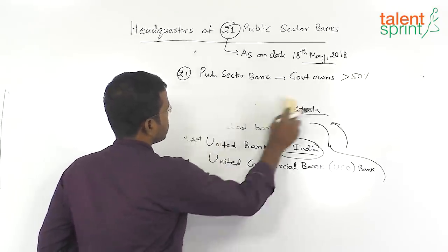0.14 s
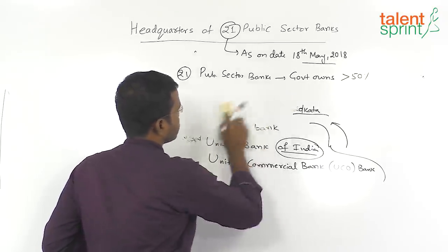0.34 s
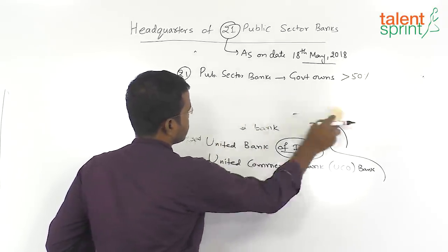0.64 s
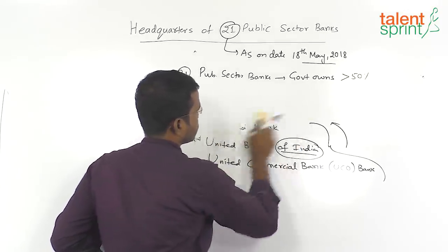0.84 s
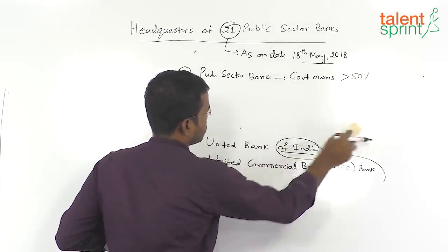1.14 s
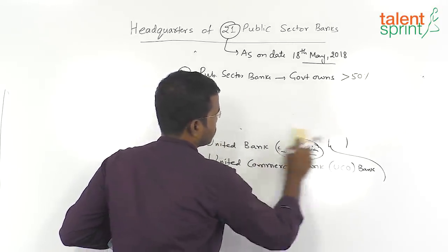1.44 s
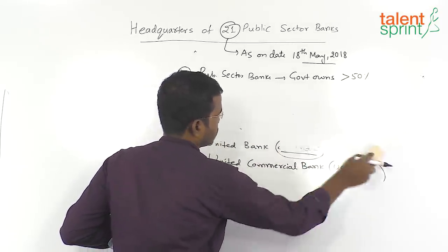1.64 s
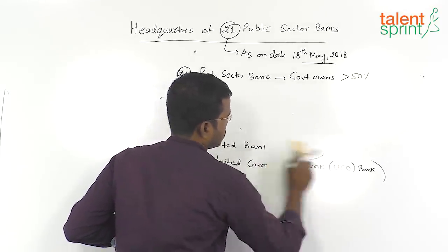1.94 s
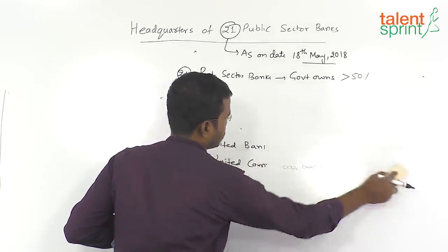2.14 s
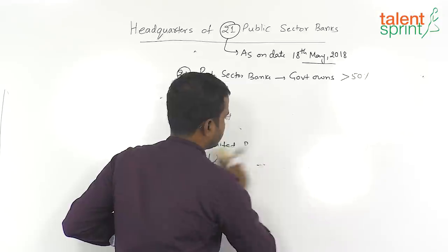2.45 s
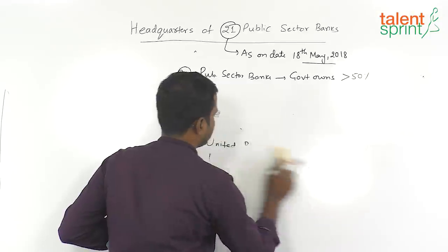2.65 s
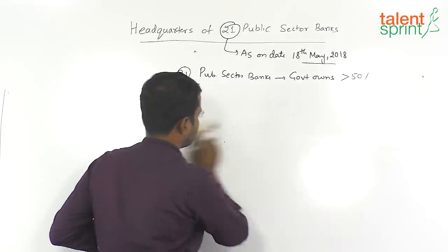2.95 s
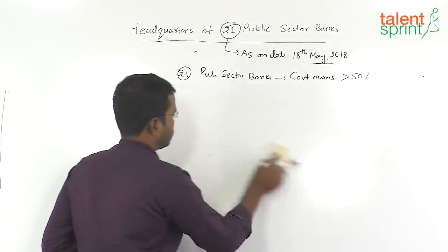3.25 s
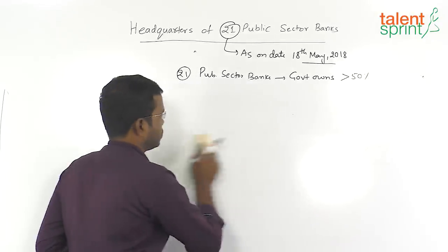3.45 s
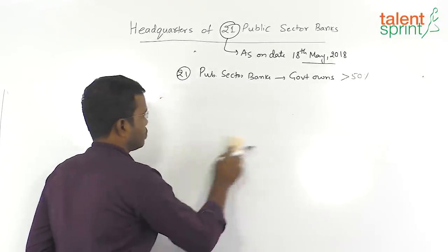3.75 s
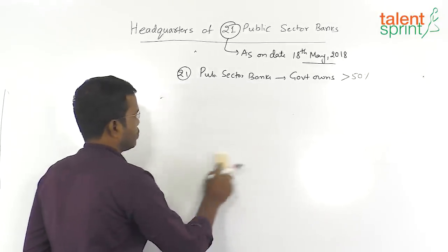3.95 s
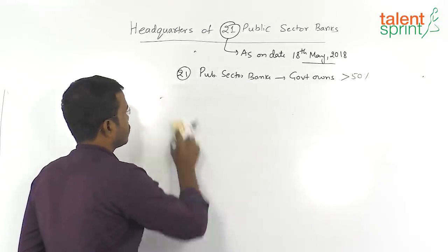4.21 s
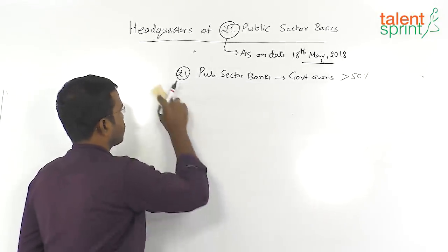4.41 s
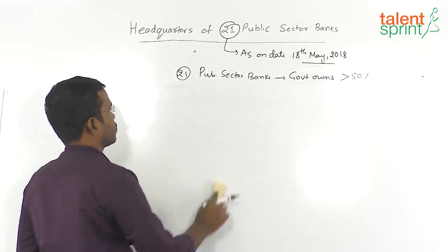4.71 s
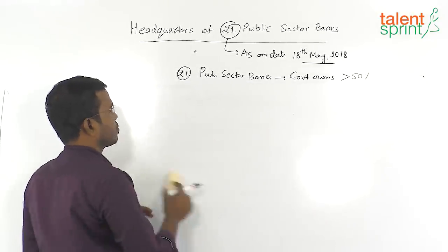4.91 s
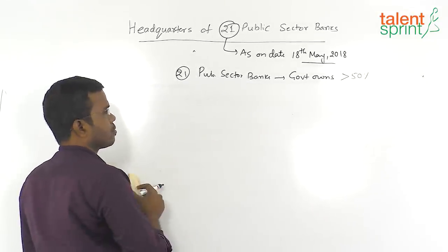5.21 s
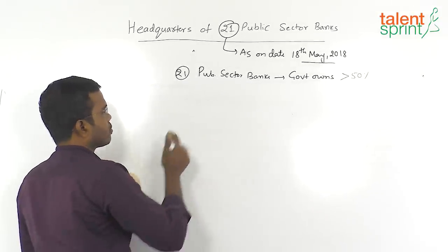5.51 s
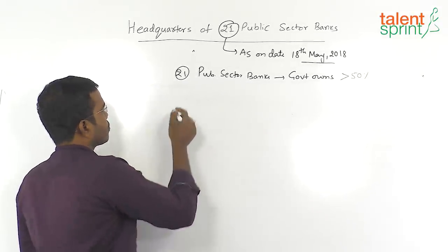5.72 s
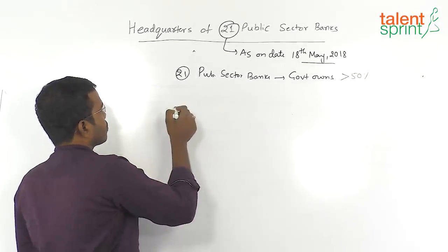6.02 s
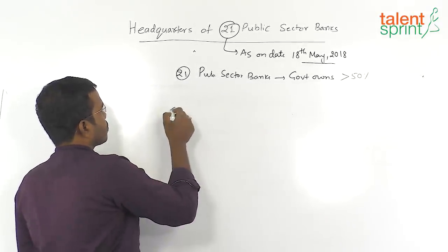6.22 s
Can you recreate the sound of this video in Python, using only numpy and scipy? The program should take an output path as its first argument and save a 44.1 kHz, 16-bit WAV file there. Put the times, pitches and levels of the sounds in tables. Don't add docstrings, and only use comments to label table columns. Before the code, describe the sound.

A felt eraser hisses back and forth across a whiteboard in brisk strokes, a marker taps once, air thumps the microphone, then cloth rustles.

```python
import sys
import numpy as np
from scipy import signal
from scipy.fft import rfft, irfft, next_fast_len
from scipy.io import wavfile
from scipy.ndimage import uniform_filter1d, map_coordinates

SR = 44100
rng = np.random.default_rng(int(sys.argv[2]) if len(sys.argv) > 2 else 0)


def natural_amplitude(level_db):
    exponent = np.asarray(level_db, float) / 20
    return 10 ** exponent


def waveform_to_disk(signal):
    frames = np.transpose(np.atleast_2d(signal))
    scaled = np.clip(frames, -1, 1) * 32767
    samples = np.round(scaled).astype(np.int16)
    wavfile.write(sys.argv[1], SR, samples)


N = 280917


def unit(x):
    return x / np.sqrt(np.mean(x ** 2) + 1e-20)


def curves(rows):
    seconds, *columns = np.transpose(rows)
    return [np.interp(np.arange(N) / SR, seconds, column) for column in columns]


def wobble(rate):
    knots = rng.standard_normal(int(N * rate / SR) + 4)
    return map_coordinates(knots, [np.arange(N) * rate / SR])


def filtered(x, response):
    m = next_fast_len(N + SR // 2)
    return irfft(rfft(x, m) * response(np.fft.rfftfreq(m, 1 / SR)), m)[:N]


def shape(points):
    f, db = np.transpose(points)
    return lambda hz: natural_amplitude(np.interp(np.log(hz + 1), np.log(f + 1), db))


def resonance(f, hz, width):
    return 1j * f * width / (hz * hz - f * f + 1j * f * width)


def scuff(grit_db, patchy_db):
    grains = rng.standard_normal(N) * natural_amplitude(grit_db * wobble(900))
    z = signal.stft(grains, nperseg=512)[2]
    field = uniform_filter1d(rng.standard_normal(z.shape), 7, 0)
    field = uniform_filter1d(field, 9, 1)
    return signal.istft(z * natural_amplitude(patchy_db * unit(field)), nperseg=512)[1][:N]


def moving_band(x, centre_hz, low, high, round_top):
    f, t, z = signal.stft(x, SR, nperseg=512)
    centre = centre_hz[np.minimum((t * SR).astype(int), N - 1)]
    octaves = np.log2((f[:, None] + 1) / centre)
    bend = np.sqrt(octaves ** 2 + round_top ** 2)
    slope = np.where(octaves < 0, low, high)
    return unit(signal.istft(z * natural_amplitude(-slope * bend), SR, nperseg=512)[1][:N])


# hiss at mid-stroke in dB, swell from start to end in dB,
# low hollow in dB, high hollow in dB, dust in dB.
STROKE_LEVELS = [(-37.5, -5, -8.5, -11, -5), (-40.5, 11.5, -11, -10, -6), (-41, -7.5, -12, -7, -4),
                 (-40, 10, -11.5, -11, -7.5), (-40, -0.5, -8.5, -10, -3.5), (-40.5, 8, -8, -15, -7),
                 (-39, -3, -8.5, -12, -4.5), (-40.5, 14.5, -10.5, -16, -8), (-39, -8, -7, -8.5, -4),
                 (-39, 20, -9, -8.5, -6.5), (-35, -11.5, -13, -9, -10), (-36.5, 14.5, -6, -9.5, -5),
                 (-37.5, -15, -12, -5, -5), (-37, 11.5, -14, -14, -7), (-37.5, -9.5, -17, -16, -4.5),
                 (-38.5, 2.5, -28, -11.5, -5), (-38, 2, -17, -16, -4), (-40.5, -8, -18, -5.5, -4)]
# time in seconds, depth of the stop in dB, half width in seconds.
HAND_TURNS = [(.262, 16, 0.011), (.462, 8, .01), (.752, 15, 0.011), (.992, 9, 0.01), (1.267, 12, 0.017),
              (1.476, 6, .01), (1.719, 12, 0.018), (1.952, 12, 0.0079), (2.254, 10, 0.012),
              (2.577, 20, 0.014), (2.829, 6, 0.0068), (3.119, 12, 0.032), (3.377, 20, 0.0068),
              (3.587, 7.5, 0.012), (3.773, 21, 0.0086), (4.089, 12, 0.019), (4.489, 16, 0.02)]


def strokes():
    first_s, last_s = -0.063, 4.85
    arch_db, dust_arch_db = 1, 3
    lean = 0.2
    low_share, high_share = 0.4, 0.49
    edges = [first_s, *np.transpose(HAND_TURNS)[0], last_s]
    place = np.interp(np.arange(N) / SR, edges, np.arange(len(edges)) * (1 - 1e-9))
    mid_db, swell_db, low_db, high_db, dust_db = np.transpose(STROKE_LEVELS)[:, place.astype(int)]
    way = place % 1
    slack = np.sin(np.pi * way) - 1
    come_db = swell_db * (way - .5 + lean * np.sin(2 * np.pi * way) / (2 * np.pi))
    hiss_db = mid_db + come_db + arch_db * slack
    low_db = low_db + low_share * come_db + 2 * wobble(14)
    high_db = high_db + high_share * come_db + 2 * wobble(14)
    dust_db = dust_db + dust_arch_db * slack + 0.5 * wobble(12)
    return hiss_db, low_db, high_db, dust_db


# time in seconds, centre in Hz.
GRIP_TILT = [(0, 7250), (.3, 6500), (.95, 6580), (1.5, 6870), (2, 7100), (2.5, 6830), (3.1, 6900),
             (3.8, 6000), (4.1, 6350), (4.3, 5800), (4.47, 5940), (4.55, 6800), (4.7, 6860), (4.9, 5900)]
# time in seconds, share 0-1.
ECHO_SHARE = [(0, 0.9), (3.3, 0.8), (3.7, 0.34), (5, 0.1)]
# centre in Hz, width in Hz.
HOLLOW_MODES = [(3020, 770), (3780, 1440)]
# frequency in Hz, density in dB per Hz.
DUST_COLOUR = [(5000, -19.5), (7500, 0.5), (9000, -1.5), (10300, -4), (11200, -12.5), (12500, -13.5),
               (15700, -18)]


def eraser():
    hiss_db, low_db, high_db, dust_db = strokes()
    t = np.arange(N) / SR
    stop_db = sum(depth * np.exp(-np.abs((t - s) / half) ** 3) for s, depth, half in HAND_TURNS)
    lift_off = np.clip((4.95 - t) / 0.13, 0, 1)
    drag = natural_amplitude(hiss_db - stop_db + 0.89 * wobble(40)) * lift_off

    hiss = scuff(grit_db=0.5, patchy_db=1.5)
    hiss = moving_band(hiss, curves(GRIP_TILT)[0], low=13.3, high=27.2, round_top=0.085)
    echo = filtered(hiss, lambda f: .55 * np.abs(resonance(f, hz=4450, width=900)) ** 2)
    hiss = hiss - curves(ECHO_SHARE)[0] * echo

    low, high = (unit(filtered(scuff(grit_db=-1.5, patchy_db=1.5),
                               lambda f: resonance(f, hz, width) ** 1.47)) for hz, width in HOLLOW_MODES)
    hollow = natural_amplitude(low_db + 0.5) * low + natural_amplitude(high_db - 2.8) * high
    dust = unit(filtered(scuff(grit_db=0.0, patchy_db=1.8), shape(DUST_COLOUR)))
    return drag * (natural_amplitude(0.45) * hiss + natural_amplitude(0.3 * stop_db) * hollow + natural_amplitude(dust_db) * dust)


# frequency in Hz, level in dB, 60 dB decay in seconds,
# share by which it starts flat.
PANEL_MODES = [(523, -9, 0.026, 0), (730, -7.5, 0.02, 0.03), (1410, -6, 0.014, 0), (1616, 0, 0.0099, 0),
               (1970, -0.5, 0.017, 0.058), (2700, -4, .008, 0), (3440, -3.5, 0.066, 0.19)]


def tap():
    tap_s, tap_db = .2782, -11.5
    t = np.arange(SR // 5) / SR
    late = 0.0041 * (1 - np.exp(-t / 0.0039))
    ring = -sum(natural_amplitude(db - 60 * t / t60) * np.sin(2 * np.pi * hz * (t - flat * late))
                for hz, db, t60, flat in PANEL_MODES)
    ring = ring * (1 - np.exp(-t / 0.00014))
    walls = rng.standard_normal(len(t)) * natural_amplitude(-60 * t / 0.36) * (t > .006)
    walls = walls / np.linalg.norm(walls)
    ring = ring + natural_amplitude(-5.5) * signal.fftconvolve(ring, walls)[:len(t)]
    out = np.zeros(N)
    out[round(tap_s * SR):][:len(t)] = natural_amplitude(tap_db - 10.0) * ring
    return out


# time in seconds, peak in dB, rise in seconds, fall in seconds,
# colour in Hz.
SLEEVE_BRUSHES = [
    (5.112, -38, 0.0016, 0.03, 5700),
    (5.178, -42.5, 0.051, .012, 8700),
    (5.258, -47.5, 0.0067, 0.038, 7000),
    (5.399, -40, 0.022, .0093, 7240),
    (5.47, -56, .0046, 0.027, 6000),
    (5.6, -56.5, .076, 0.2, 7100),
    (5.905, -47.5, .069, .022, 5230),
    (5.87, -47.5, .086, .055, 1800),
]
# time in seconds, peak in dB, rise in seconds, fall in seconds,
# colour in Hz.
CAP_SCRAPES = [
    (5.12, -42, .008, 0.02, 2700),
    (5.324, -41.5, .017, 0.019, 6600),
    (5.325, -46, 0.014, .015, 10500),
    (6.2, -48, .012, 0.014, 4200),
    (.49, -46, .012, .006, 3600),
    (6.5, -52.5, .015, .2, 4930),
    (6.275, -48.5, .025, 0.13, 7200),
    (6.265, -58, 0.014, .2, 9600),
]


def rustles():
    out, t = np.zeros(N), np.arange(N) / SR
    brushes = [(*row, 1) for row in SLEEVE_BRUSHES] + [(*row, 0.28) for row in CAP_SCRAPES]
    for s, db, rise, fall, hz, width in brushes:
        grains = rng.standard_normal(N) * natural_amplitude(2.0 * wobble(300))
        brush = filtered(grains, lambda f: resonance(f, hz, width * hz) ** 2 / (1 + (f / 13200) ** 6))
        swell = np.exp(-((t - s) / np.where(t < s, rise, fall)) ** 2)
        out += natural_amplitude(db) * unit(brush) * swell
    return out


def eddies(spectrum, even, span):
    x = unit(filtered(rng.standard_normal(N), shape(spectrum)))
    power = uniform_filter1d(x ** 2, int(span * SR))
    swell = np.abs(uniform_filter1d(power, int(span * SR))) + 0.044
    return unit(x / swell ** (even / 2))


def puffs(s, db, half, calm_db):
    t = np.arange(N) / SR
    power = sum(natural_amplitude(2 * g) * np.exp(-((t - a) / h) ** 2) for a, g, h in zip(s, db, half))
    return np.sqrt(natural_amplitude(2 * calm_db) + power)


# time in seconds, slow eddies in dB, half length in seconds,
# middle eddies in dB over the slow ones.
AIR_PUFFS = [(0.624, -25, 0.031, -28), (1.105, -25.5, 0.067, -12), (1.5, -30.5, 0.13, -26),
             (1.67, -9.5, 0.023, -30), (1.76, -23.5, 0.033, -26), (1.988, -25, 0.068, -6.5),
             (2.123, -24, 0.05, -32), (2.39, -29.5, 0.034, -4.5), (2.55, -28, 0.038, 0),
             (2.664, -21, 0.041, -29), (2.815, -17.5, 0.093, -12), (3.03, -28, 0.027, 1.5),
             (3.148, -20.5, 0.049, -28), (3.194, -16, 0.032, -8), (3.3, -10, 0.036, -5.5),
             (3.396, -9, 0.063, -6), (3.487, -5.5, 0.034, -8), (3.624, -4, 0.03, -8),
             (3.766, -24, 0.054, -12), (3.965, -26.5, 0.084, -9), (4.35, -24, 0.18, -12),
             (4.563, -22.5, 0.068, -22), (4.656, -26.5, 0.036, 4), (5.096, -24, 0.038, -12),
             (5.21, -7.5, 0.032, 0), (5.299, -8.5, 0.058, -6.5), (5.431, -8, 0.039, -16),
             (5.65, -15, 0.05, -28), (5.935, -25.5, 0.044, -25), (6.278, -27, 0.042, -10)]
# time in seconds, level in dB, half length in seconds.
WHIRLS = [(0, -39, .04), (0.998, -39.5, 0.16), (1.936, -38.5, 0.084), (2.428, -32.5, 0.062),
          (3.042, -39, 0.11), (3.203, -39, .03), (3.293, -32.5, 0.046), (3.604, -37, 0.056),
          (4.33, -36.5, 0.047), (4.652, -24.5, 0.026), (4.945, -39, 0.022), (5.276, -30.5, 0.024),
          (5.55, -39.5, 0.12), (5.692, -37, 0.043), (5.864, -35, 0.064), (6.256, -37.5, 0.039)]
# frequency in Hz, density in dB per Hz.
SLOW_EDDIES = [(4, -32), (10, 1), (19, 1.5), (29, -3.5), (38, -16.5), (55, -34.5), (120, -59), (300, -120)]
MIDDLE_EDDIES = [(20, -61), (36, -2.5), (46, 2), (62, -6), (90, -26.5), (200, -60.5), (700, -120)]
QUICK_EDDIES = [(40, -66), (72, -2.5), (95, -2), (140, -5.5), (200, -16.5), (350, -26.5), (800, -76),
                (2000, -120)]


def draught():
    slow_calm_db, middle_calm_db, quick_calm_db = -35.5, -44, -44
    s, db, half, over_db = np.transpose(AIR_PUFFS)
    slow = eddies(SLOW_EDDIES, even=.9, span=.04)
    middle = eddies(MIDDLE_EDDIES, even=.85, span=.025)
    quick = eddies(QUICK_EDDIES, even=0.71, span=0.1)
    thumps = puffs(s, db, half, slow_calm_db) * slow
    thumps = thumps + puffs(s, db + over_db, 0.76 * half, middle_calm_db) * middle
    thumps = thumps / (1 + np.abs(thumps / .9) ** 4) ** .25
    return thumps + puffs(*np.transpose(WHIRLS), quick_calm_db) * quick


# frequency in Hz, density in dB per Hz.
ROOM_COLOUR = [(90, -44), (150, -3.5), (200, -2.5), (260, -6), (400, -7.5), (750, -13), (1050, -15.5),
               (2000, -18), (4000, -22.5), (7000, -29.5), (9000, -36), (12000, -44.5), (15700, -49)]


def room():
    air = unit(filtered(scuff(grit_db=-1.7, patchy_db=0.82), shape(ROOM_COLOUR)))
    fan = unit(filtered(rng.standard_normal(N), lambda f: resonance(f, hz=742, width=11)))
    return natural_amplitude(-42.5) * air + natural_amplitude(-62) * fan


def scene():
    return (eraser() + tap() + rustles() + draught() + room())[None]


def roll_off(x):
    return signal.sosfilt(signal.butter(12, 15710, fs=SR, output="sos"), x)


def record(dry):
    return roll_off(dry)


dry = scene()
out = record(dry)
waveform_to_disk(out)
```